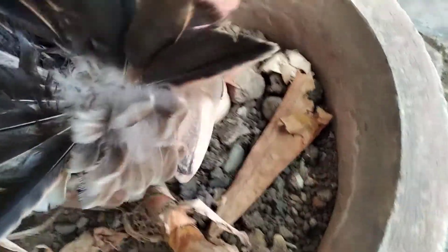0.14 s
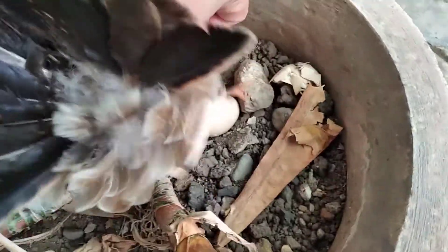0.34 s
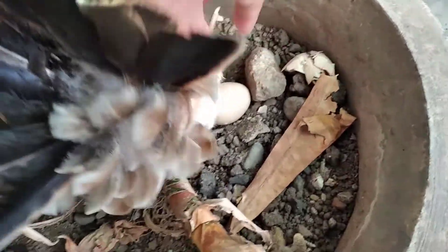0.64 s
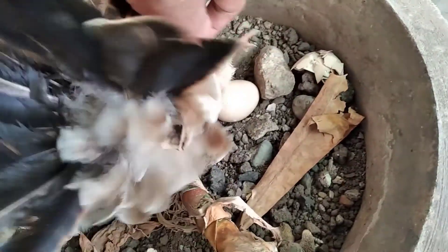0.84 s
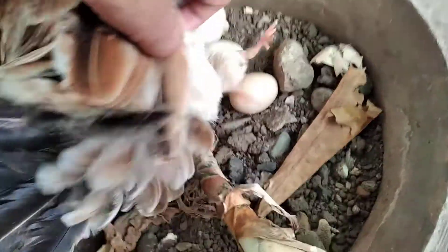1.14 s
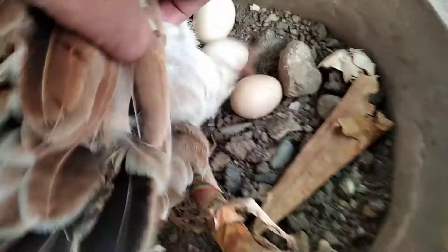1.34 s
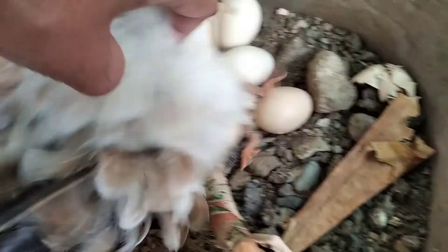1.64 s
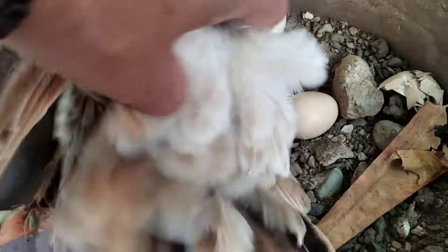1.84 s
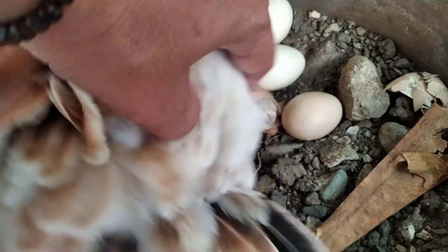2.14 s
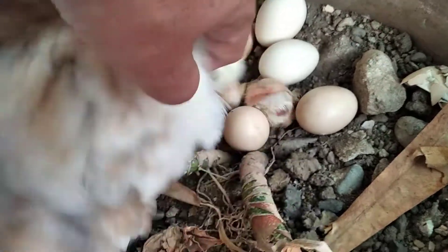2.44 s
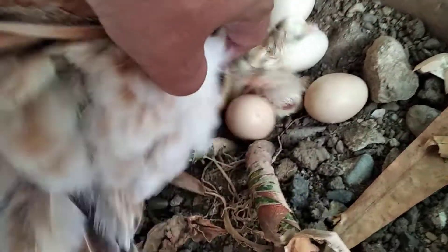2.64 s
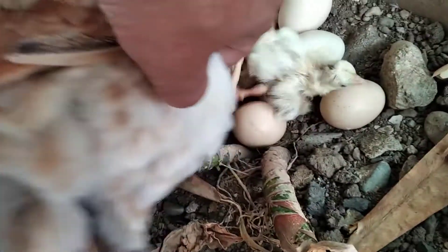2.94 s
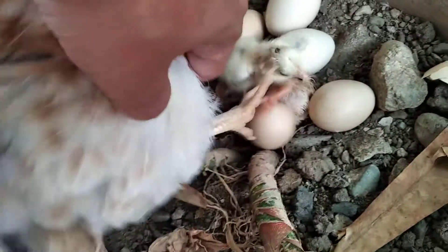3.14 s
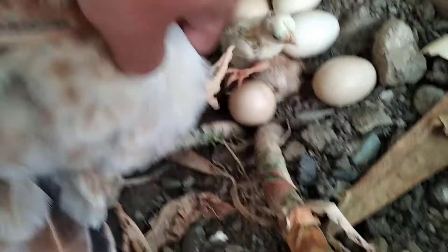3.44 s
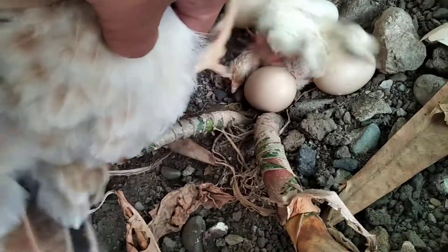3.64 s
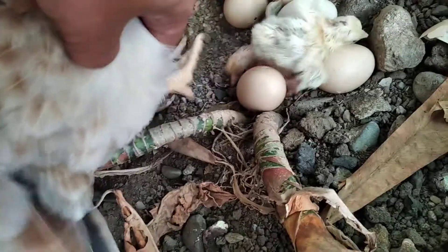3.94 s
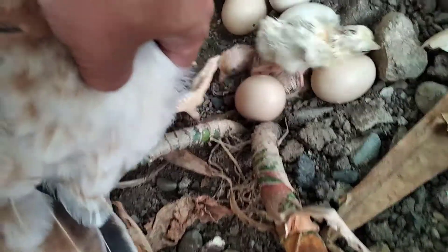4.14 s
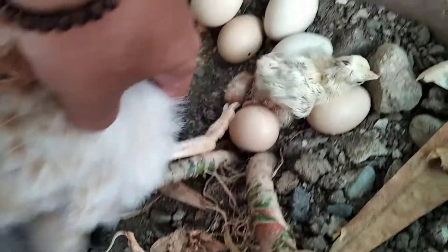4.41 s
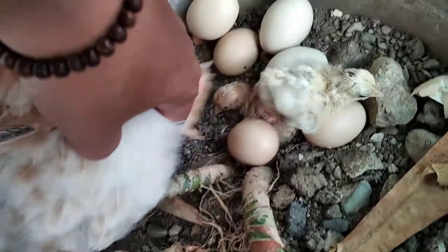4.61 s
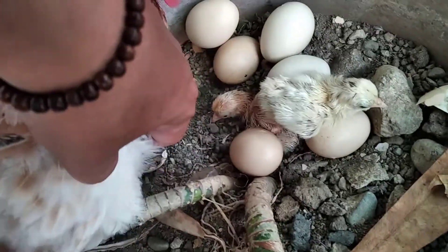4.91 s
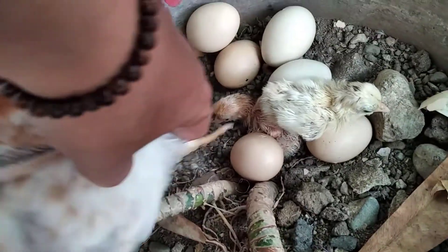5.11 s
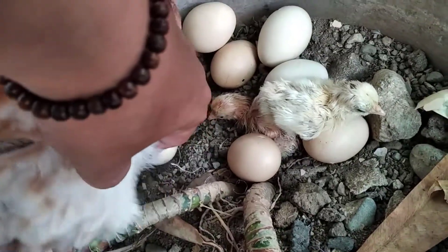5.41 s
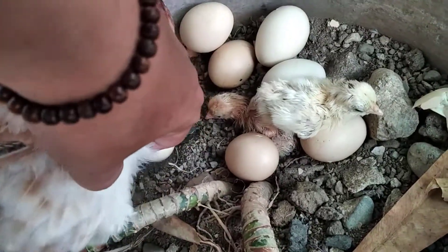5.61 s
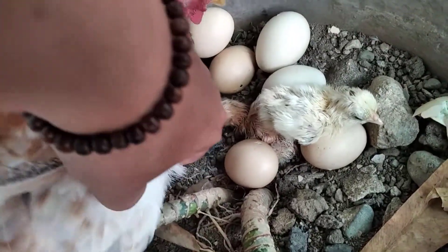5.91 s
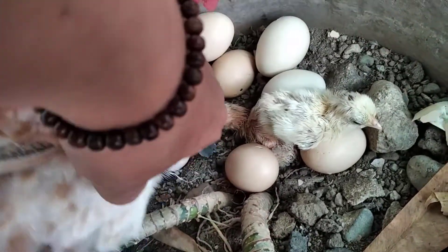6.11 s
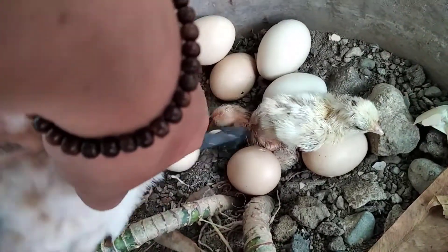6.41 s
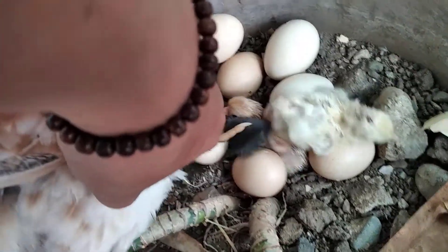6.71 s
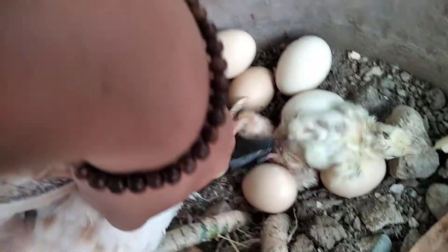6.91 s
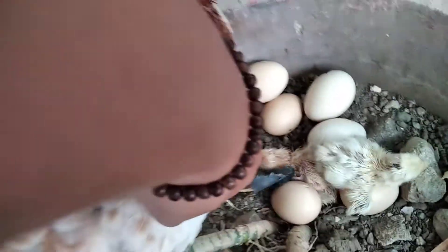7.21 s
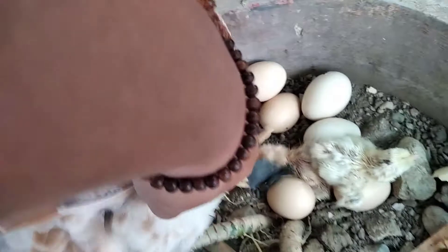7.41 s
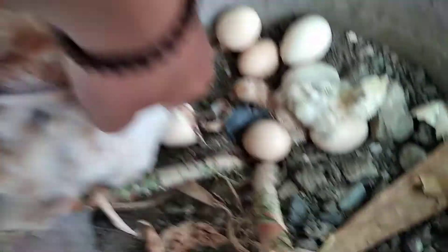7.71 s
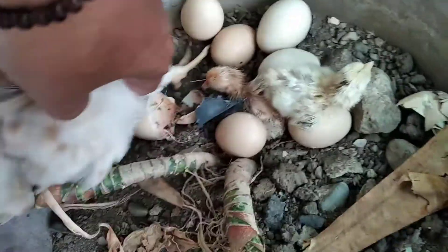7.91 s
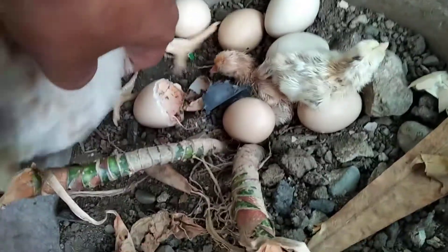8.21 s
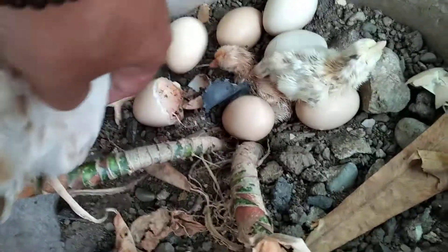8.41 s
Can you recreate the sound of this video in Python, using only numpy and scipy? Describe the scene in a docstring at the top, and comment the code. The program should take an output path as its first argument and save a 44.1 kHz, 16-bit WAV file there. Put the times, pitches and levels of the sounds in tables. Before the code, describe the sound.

Raspy hen squawks give way to short, regular clucks, with piercing chick squeals, small chirps, feather rustle and a few sharp gravel ticks.

```python
"""A hen lifted off her nest in a stone tub squawks, then clucks about three times a second: a
near-sine two-register voice with rasp. Behind her lie a far yard hum and feather rustle, both shaped noise.
Chicks peep and squeal in thin gliding whistles; gravel ticks are decaying noise bursts with a thump.
Two close microphone ports: the left hears the treble later, and its yard and rustle have more bass."""
import sys
import numpy as np
from scipy import signal
from scipy.fft import rfft, irfft
from scipy.io import wavfile
from scipy.ndimage import uniform_filter1d

SR = 44100
rng = np.random.default_rng(int(sys.argv[2]) if len(sys.argv) > 2 else 0)


def store_pcm(level_fs):
    """Save levels as 16-bit WAV."""
    pcm = np.round(np.clip(level_fs, -1, 1) * 32767).astype(np.int16)
    wavfile.write(sys.argv[1], SR, np.atleast_2d(pcm).T)


N = 377055
TIME_S = np.arange(N) / SR


def from_db(db):
    """Logarithmic level: decibels to amplitude gain."""
    return 10 ** (np.asarray(db) / 20)


def rms_one(x):
    """Normalisation: scale to unit rms."""
    return x / np.sqrt(np.mean(x ** 2) + 1e-20)


def drift(hz, size=N):
    """Random modulation: white noise through a two-pole low-pass, scaled to unit rms."""
    pole = np.exp(-2 * np.pi * hz / SR)
    white = rng.standard_normal(size + SR // 4)
    smooth = signal.lfilter([1], [1, -2 * pole, pole * pole], white)
    return rms_one(smooth[SR // 4:])


def add(out, start, sound, pan_db):
    """Superposition: mix a sound in at a time, with a level difference between the ports."""
    i = int(start * SR)
    sound = sound[:N - i]
    out[:, i:i + len(sound)] += sound * from_db([[pan_db / 2], [-pan_db / 2]])


def fade(size, rise_s, fall_s):
    """Amplitude envelope: sine-squared onset and release."""
    t = np.arange(size) / SR
    nearest_end = np.minimum(t / rise_s, t[::-1] / fall_s)
    return np.sin(np.pi / 2 * np.clip(nearest_end, 0, 1)) ** 2


def columns(rows):
    """Linear interpolation: one sampled curve for each column after the time."""
    start_s, *rest = np.transpose(rows)
    t = np.arange(start_s[0], start_s[-1], 1 / SR)
    return [np.interp(t, start_s, column) for column in rest]


def tone(hz, overtones_db, slope_db, count):
    """Harmonic series: a unit-rms fundamental, with overtones that fall off by a slope."""
    phase = 2 * np.pi * (np.cumsum(hz) / SR + rng.random())
    upper = sum(from_db(overtones_db - slope_db * k) * np.cos((k + 2) * phase) for k in range(count))
    return np.sqrt(2) * (np.sin(phase) + upper)


# Bearing of the hen: time_s [s], left_over_right_db [dB]
HEN_BEARING = [(.7, 1), (1.7, 3.5), (2.7, -1), (5.3, -2), (7.4, 3)]


def hen_pan(start_s):
    """Level difference between ports: the hen's left over right level at a time."""
    return np.interp(start_s, *np.transpose(HEN_BEARING))


# Squawk contours, a list for each call: time_s [s], pitch_hz [Hz], level_db [dB], overtones_db [dB]
SQUAWK_CONTOURS = [
    [(0, 698.7, -17, -14.5), (.28, 674.3, -19, -25.5), (.305, 556.6, -22, -12.5), (.33, 502, -20.5, -10.5),
     (.35, 318, -40.5, -5)],
    [(.597, 856, -23.5, -16.5), (.77, 894, -21.5, -9.5), (.81, 851, -22, -0.5), (.83, 609, -28, -4),
     (.86, 430, -33.5, -9)],
    [(.885, 800, -35, 0), (.91, 806, -24, -10), (.935, 724, -24, -11), (.94, 492, -19, -11),
     (.972, 388, -40, 4)],
    [(1.352, 647, -28, -24), (1.365, 566.5, -19.5, -20), (1.45, 375, -30.5, -7)],
    [(1.645, 889, -26.5, -7.5), (1.718, 873, -25, -3), (1.723, 556, -32, -8), (1.742, 407, -18.5, -14)],
    [(8, 535.8, -32, -3.5), (8.118, 610.7, -29.5, 2), (8.122, 891, -21, -10), (8.22, 1047, -27, 0),
     (8.224, 1397, -20.5, -8.5), (8.29, 1314, -20, -16)],
]
# Moments when each squawk flips to the other register: time_s [s]
REGISTER_FLIPS = [
    [.005, .028, .083, .1, .118, .157, .192, .212, .233, .252, .27, .287],
    [.615, .69, .757, .808],
    [.9],
    [1.358, 1.371, 1.395, 1.417],
    [1.712],
    [8.126, 8.14],
]
# Instability of each squawk: jump [log frequency ratio], rattle_depth [dB], uneven_cycles [0-1]
SQUAWK_WARBLES = [(0.45, 1, 0), (-0.33, -0.5, 0.28), (-0.334, 1.5, 0.4), (0.4, 2, 0), (-0.376, 0.5, 0.41),
                  (-0.22, 3, 0.24)]
FLIP_S, RATTLE_HZ = .01, 61.93
HOARSE = 0.31   # depth of the rough grain on the voice


def squawks():
    """Register breaks in a self-oscillating voice, with rattle, alternating cycles and turbulent rasp."""
    out = np.zeros((2, N))
    for rows, flips, (jump, rattle_db, uneven) in zip(SQUAWK_CONTOURS, REGISTER_FLIPS, SQUAWK_WARBLES):
        hz, level_db, overtones_db = columns(rows)
        size, start = len(hz), rows[0][0]
        t = start + TIME_S[:size]
        rattle_hz = RATTLE_HZ * (1 + .3 * drift(30, size=size))
        rattle = np.sin(2 * np.pi * np.cumsum(rattle_hz) / SR)
        flip = sum(rng.uniform(.7, 1.1) * np.exp(-(2 * (t - s) / FLIP_S) ** 4) for s in flips)
        # The voice sags and thickens just before it flips up
        sag = max(jump, 0) * sum(np.exp(-((t - s) / FLIP_S + 1.1) ** 2) for s in flips)
        warble = rattle_db * (.01 * rattle + .007 * drift(60, size=size))
        hz = hz * np.exp(jump * flip - .25 * sag + warble + .04 * drift(500, size=size))
        # The higher register is weaker
        throb_db = -13 * jump * flip + rattle_db * rattle + 1.8 * drift(135, size=size)
        thickness_db = overtones_db + 12 * sag + 2.5 * drift(400, size=size)
        voice = tone(hz, thickness_db, slope_db=6.5, count=8)
        # Strong and weak cycles alternate
        voice = voice * (1 + uneven * np.cos(np.pi * np.cumsum(hz) / SR))
        voice = voice * (1 + HOARSE * drift(600, size=size))
        rasp = from_db(overtones_db - 4.0) * drift(4800, size=size)   # air through the throat
        level = from_db(level_db + throb_db) * fade(size, 0.0019, 0.0035)
        add(out, start, level * (voice + rasp), hen_pan(start))
    return out


# Clucks: start_s [s], length_s [s], high_register_hz [Hz], level_db [dB]
CLUCK_CALLS = [(1.954, 0.027, 939, -20), (2.285, 0.027, 847, -22.5), (2.657, 0.028, 890, -20),
               (2.953, 0.035, 885, -20), (3.273, 0.043, 900, -19), (3.6, 0.027, 878, -23),
               (3.913, 0.042, 792, -20.5), (4.258, .026, 822, -17), (4.613, 0.025, 832, -18),
               (4.94, .025, 807, -15.5), (5.264, 0.032, 874, -16.5), (5.568, 0.027, 829, -17),
               (5.898, 0.028, 829, -17), (6.215, 0.02, 788, -17), (6.563, 0.033, 868, -19.5),
               (7.006, 0.026, 873, -21), (7.369, 0.032, 913, -24), (7.676, 0.03, 832, -26),
               (7.7, .027, 476, -24.5), (7.726, 0.024, 768, -28), (8.258, .037, 715, -17.5)]
# Nearly every cluck drops to the low register at its end
HEN_LOW_HZ, CLUCK_TAIL_S, REGISTER_JUMP_S = 554, 0.01125, 0.0047
TAIL_SAG_HZ_PER_S = 17100   # the low register sinks as a cluck dies
THIN_ABOVE_HZ, THIN_DB_PER_OCTAVE = 870, 112   # the very top of the high register is weak
# A softer cluck longer than this spends a share of the extra time in a low lead-in
BRISK_CLUCK_S, LEAD_SHARE = .027, 0.99


def clucks():
    """Two-register oscillation: nearly every cluck drops to a low sinking tail; overtones grow downwards."""
    out = np.zeros((2, N))
    for start, length, high_hz, level_db in CLUCK_CALLS:
        t = TIME_S[:int(length * SR)]
        size = len(t)
        lead = LEAD_SHARE * max(length - BRISK_CLUCK_S, 0) * (level_db < -17.5)
        tail_start = length - CLUCK_TAIL_S
        in_high = 1. * (t >= lead) * (t < tail_start)
        high = uniform_filter1d(in_high, int(REGISTER_JUMP_S * SR), mode="nearest")
        low_hz = HEN_LOW_HZ - TAIL_SAG_HZ_PER_S * np.maximum(t - length + CLUCK_TAIL_S, 0)
        hz = (low_hz + (high_hz - low_hz) * high) * (1 + 0.06 * drift(193, size=size))
        thin_db = -THIN_DB_PER_OCTAVE * np.maximum(np.log2(hz / THIN_ABOVE_HZ), 0)
        overtones_db = -22 + 14 * np.log2(850 / hz) + 3 * drift(410, size=size)
        voice = tone(hz, overtones_db, slope_db=6, count=2)
        level = from_db(level_db + thin_db + 0.84 * drift(230, size=size))
        level = level * fade(size, 0.0058 + lead / 2, 0.0091)
        add(out, start, level * voice, hen_pan(start))
    return out


def hen():
    """Source-filter principle: throat and beak resonances colour the squawks and clucks."""
    out = squawks() + clucks()
    out = signal.sosfilt(signal.butter(4, 370, "high", fs=SR, output="sos"), out)
    # The beak passes little near 3 kHz
    out = out - .7 * signal.lfilter(*signal.iirpeak(3000, 2.5, fs=SR), out)
    # Throat resonance
    return out + 2.84 * signal.lfilter(*signal.iirpeak(1750, 5, fs=SR), out)


# Port balance of the rustle and yard noise: frequency_hz [Hz], left_over_right_db [dB]
NOISE_BALANCE = [(330, 12.5), (700, -1), (5000, 2), (15000, 10)]


def coloured(white, spectrum, alike_hz):
    """Interchannel coherence: shaped shared and separate noises; likeness falls towards the treble."""
    hz = np.fft.rfftfreq(N, 1 / SR) + 1

    def at(points):
        """Interpolation over log frequency."""
        point_hz, point_db = np.array(points).T
        return np.interp(np.log(hz), np.log(point_hz), point_db)

    shared, left, right = rfft(white)
    alike = 1 / (1 + hz / alike_hz)
    pair = np.sqrt(alike) * shared + np.sqrt(1 - alike) * np.array([left, right])
    return irfft(pair * from_db(at(spectrum) + at(NOISE_BALANCE) * [[.5], [-.5]]), N)


# Relative spectrum of the yard: frequency_hz [Hz], density_db [dB per Hz]
YARD_SPECTRUM = [(30, -28.5), (103, 4.5), (330, -4.5), (570, 3.5), (1440, -3.5), (2400, -1), (8200, -10),
                 (12000, -20.5)]
YARD_DB = -42.5


def yard():
    """Stationary noise: a steady far background with a fixed spectrum."""
    return from_db(YARD_DB) * rms_one(coloured(rng.standard_normal((3, N)), YARD_SPECTRUM, alike_hz=1110))


# Relative spectrum of the feathers: frequency_hz [Hz], density_db [dB per Hz]
FEATHER_SPECTRUM = [(150, -34), (700, -22), (3500, -17), (8000, -15), (12000, -24)]
# Strokes of feathers and hand: start_s [s], length_s [s], level_db [dB]
FEATHER_STROKES = [(1.223, 0.087, -30), (1.668, 0.18, -26), (1.784, 0.54, -35.5), (2.402, 0.26, -32.5),
                   (2.691, .44, -30), (3.163, 0.16, -37.5), (3.581, 0.081, -27), (5.047, 0.22, -37),
                   (5.678, 0.47, -35.5), (6.379, 0.37, -42.5), (7.87, .68, -37.5)]
DULL_PER_S = 0.64   # share of dull sound grows with the length of a stroke


def rustle():
    """Friction noise: dense fine grains in uneven clumps, with longer strokes sounding duller."""
    grain_db = 2.5 * rng.exponential(1, N) + 1.8 * drift(60)
    grains = rng.standard_normal((3, N)) * from_db(grain_db)
    bright = rms_one(coloured(grains, FEATHER_SPECTRUM, alike_hz=1360.0))
    dull = rms_one(signal.sosfilt(signal.butter(2, 2200, fs=SR, output="sos"), bright))
    out = from_db(-45.5 + 6.2 * drift(4.0)) * bright   # faint fidgeting throughout
    for start, length, level_db in FEATHER_STROKES:
        part = slice(int(start * SR), int((start + length) * SR))
        size = part.stop - part.start
        share = np.clip(DULL_PER_S * length, 0, 1)
        stroke = from_db(level_db + 4.3 * drift(4.0, size=size)) * fade(size, 0.23 * length, 0.53 * length)
        out[:, part] += stroke * (share * dull[:, part] + (1 - share) * bright[:, part])
    return out


def arch(first_hz, crest_hz, last_hz, crest_s, length):
    """Frequency glide: pitch eases up to a crest, then falls away ever faster."""
    turn = np.interp(TIME_S[:int(length * SR)], [0, crest_s, max(length, crest_s)], [-1, 0, 1])
    below_rising = (crest_hz - first_hz) * np.sin(np.pi / 2 * turn) ** 2
    below_falling = (crest_hz - last_hz) * np.abs(turn) ** 1.62
    return crest_hz - np.where(turn < 0, below_rising, below_falling)


CHICK_PURER_DB_PER_OCTAVE = 19   # the overtone fades as a chick sings higher


def cheep(hz):
    """Near-pure whistle: a fundamental and one overtone that weakens with pitch."""
    overtone_db = -7.0 - CHICK_PURER_DB_PER_OCTAVE * np.log2(hz / 2575)
    return tone(hz, overtone_db, slope_db=0, count=1)


# Peeps much louder on the left are weakened near this pitch
WEAK_HZ, WEAK_WIDTH_HZ, WEAK_DB = 5150, 435, -14


def weak(hz):
    """Gaussian notch weight: 1 at the weak pitch, near 0 far from it."""
    return np.exp(-((hz - WEAK_HZ) / WEAK_WIDTH_HZ) ** 2)


# Arched peeps: start_s [s], length_s [s], crest_after_s [s], first_hz [Hz], crest_hz [Hz],
# last_hz [Hz], level_db [dB], left_over_right_db [dB]
ARCHED_PEEPS = [(0.658, 0.16, 0.052, 5450, 5840, 4700, -34, 14),
                (2.157, 0.051, .02, 4990, 5350, 4660, -9, 17), (3.119, .1, 0.033, 5200, 5510, 2300, -21, 5),
                (3.309, 0.039, 0.022, 2700, 3900, 2900, -34, 11),
                (3.528, 0.047, 0.014, 3800, 4040, 2700, -27.5, 4),
                (3.561, 0.073, 0.024, 5300, 5500, 2300, -23, 8),
                (3.968, .095, .05, 5100, 5350, 2500, -23, 7), (4.117, .066, .04, 2900, 4000, 3100, -29, 9),
                (4.433, .06, .04, 3100, 5350, 4900, -37, 6), (4.761, .08, .04, 2700, 4650, 2200, -27, 14.5),
                (5.367, 0.071, 0.04, 3300, 5200, 3400, -33.5, 20.5),
                (6.098, 0.063, 0.037, 3400, 5200, 3300, -32.5, 13.5),
                (6.686, .058, .03, 2700, 5100, 3200, -31, 17),
                (7.069, .048, .018, 3940, 4680, 2900, -25, 7.5),
                (7.134, .072, .04, 2980, 3920, 3400, -34, 12.5),
                (7.62, .032, .014, 4850, 5400, 4900, -36, 6),
                (8.228, .07, 0.051, 3600, 5300, 2300, -33.5, 20)]
# Straight glides: start_s [s], length_s [s], first_hz [Hz], last_hz [Hz], level_db [dB],
# left_over_right_db [dB]
SHORT_TWITTERS = [(2.517, .014, 4720, 3800, -23.5, 3), (5.139, 0.03, 2820, 4800, -30.5, 13.5),
                  (5.761, 0.041, 2820, 5600, -35, 19), (6.306, 0.016, 2620, 3600, -41.5, 3),
                  (6.441, 0.043, 2650, 2540, -36.5, 0), (6.925, 0.046, 3050, 3900, -29, 8.5),
                  (7.989, 0.04, 2710, 5400, -31.5, 17), (8.341, 0.041, 3150, 4100, -36, 8)]


def peeps():
    """Frequency-modulated whistles: arched peeps and straight twitters."""
    out = np.zeros((2, N))
    for start, length, *shape, level_db, pan_db in ARCHED_PEEPS + SHORT_TWITTERS:
        if len(shape) > 2:
            crest_s, first_hz, crest_hz, last_hz = shape
            hz = arch(first_hz, crest_hz, last_hz, crest_s, length)
        else:
            hz = np.linspace(*shape, int(length * SR))
        thin_db = WEAK_DB * (pan_db > 10) * weak(hz)
        level = from_db(level_db + thin_db + 2.0 * drift(370, size=len(hz)))
        add(out, start, level * fade(len(hz), 0.18 * length, 0.25 * length) * cheep(hz), pan_db)
    return out


# Squeal contours, a list for each call: time_s [s], pitch_hz [Hz], level_db [dB]
SQUEAL_CONTOURS = [
    [(1.572, 5560, -31), (1.583, 6180, -13.5), (1.606, 5350, -20.5), (1.617, 4100, -15.5),
     (1.66, 5650, -36), (1.683, 5150, -27)],
    [(1.8, 6020, -23.5), (1.836, 6490, -10.5), (1.849, 6190, -12), (1.855, 4910, -20.5), (1.872, 4740, -23)],
    [(2.523, 5650, -18), (2.543, 6080, -8.5), (2.572, 6166, -6), (2.575, 6180, -14), (2.584, 5900, -5),
     (2.596, 5800, -8), (2.603, 5530, -9.5), (2.613, 5260, -2.5), (2.643, 5200, -12), (2.654, 2930, -17.5)],
    [(2.802, 5090, -13), (2.835, 5500, -4.5), (2.865, 5564, -5), (2.908, 4960, -8.5)],
    [(3.686, 3700, -19), (3.704, 4700, -21), (3.714, 4860, -8), (3.72, 3340, -15), (3.736, 4700, -4),
     (3.748, 2730, -24)],
]
# Flutter of each squeal: left_over_right_db [dB], quickens_s [s], first_hz [Hz], last_hz [Hz],
# slowing [exponent], early_depth [0-1], late_hz [Hz], late_depth [0-1], pitch_pull [-1 to 1]
SQUEAL_FLUTTERS = [(3, 1.62, 70, 70, 2, .85, 500, .5, .42), (5.6, 1.85, 600, 720, 2, 1, 750, .9, -.5),
                   (7.4, 2.62, 500, 0, 8, .7, 640, .6, .42), (5.4, 2.867, 650, 160, 2, .9, 720, .75, .42),
                   (5.7, 3.71, 700, 700, 2, .6, 900, .3, .42)]


def squeals():
    """Amplitude and frequency modulation: a flutter whose rate jumps up sets side tones on a whistle."""
    out = np.zeros((2, N))
    for rows, flutter_row in zip(SQUEAL_CONTOURS, SQUEAL_FLUTTERS):
        pan_db, quickens, first_hz, last_hz, slowing, early_depth, late_hz, late_depth, pull = flutter_row
        hz, level_db = columns(rows)
        hz = uniform_filter1d(hz, size=200, mode="nearest")
        size, start = len(hz), rows[0][0]
        t = TIME_S[:size]
        late = np.clip((start + t - quickens) / 0.0038, 0, 1)
        remaining = np.clip(1 - t / (quickens - start), 0, 1)
        early_hz = last_hz + (first_hz - last_hz) * remaining ** slowing
        flutter_hz = early_hz + (late_hz - early_hz) * late
        depth = early_depth + (late_depth - early_depth) * late
        depth = depth * np.minimum(flutter_hz / 60, 1)   # a stalled flutter leaves a clean whistle
        beat = np.cumsum(flutter_hz * np.exp(0.06 * drift(120, size=size))) / SR % 1
        # Each beat closes slowly, then snaps open
        flutter = 1 - depth * beat ** 1.8 * np.minimum((1 - beat) / .12, 1)
        hoarse = 1 + .12 * depth * drift(400, size=size)
        flutter = uniform_filter1d(flutter, size=24) * hoarse
        # Pitch is pulled along, so one side tone is stronger
        hz = hz + pull * depth * flutter_hz * np.sin(2 * np.pi * beat)
        level = from_db(level_db) * flutter * fade(size, 0.00086, 0.0036)
        add(out, start, level * cheep(hz), pan_db)
    return out


# Gravel ticks: start_s [s], level_db [dB, scales crack, grit and thump together]
GRAVEL_TICKS = [(1.485, -20), (1.7466, -2), (2.035, -25), (2.5153, -11), (6.8958, -27)]
THUMP_HZ, THUMP_S, THUMP_DB = 205, 0.0059, -22   # a low thump under the crack; dB relative to the tick


def gravel():
    """Impulse excitation: a sharp crack, a short gritty tail and a low damped thump."""
    out, t = np.zeros((2, N)), TIME_S[:SR // 25]
    thump = from_db(THUMP_DB) * np.sin(2 * np.pi * THUMP_HZ * t) * np.exp(-t / THUMP_S)
    decay = 1.6 * np.exp(-t / 0.001) + 0.2 * np.exp(-t / 0.015)
    for start, level_db in GRAVEL_TICKS:
        grit = .5 * decay * rng.standard_normal(len(t))
        crack = 2 * (t == 0)
        add(out, start, from_db(level_db) * (grit + crack + thump), pan_db=3)
    return signal.sosfilt(signal.butter(2, 120, "high", fs=SR, output="sos"), out)


def tub(x):
    """Reverberation: convolution with decaying noise, for faint echoes off tub wall and ground."""
    t = TIME_S[:SR // 8]
    tail = rng.standard_normal((2, len(t))) * np.exp(-t / .028) * (t > .002)
    return signal.fftconvolve(x, from_db(-45) * tail, axes=1)[:, :N]


# Phase of the left port: frequency_hz [Hz], phase_rad [radians]
LEFT_PORT_PHASE = [(900, -.4), (1250, -2.4), (2200, -2.8), (2800, -6.1), (5500, -13.5), (15000, -38)]


def scene():
    """Superposition of all sources; the left port's phase lag grows towards the treble."""
    near = hen() + peeps() + squeals() + gravel()
    left, right = near + tub(near) + rustle() + yard()
    phase = np.interp(np.fft.rfftfreq(N, 1 / SR), *np.transpose(LEFT_PORT_PHASE))
    return np.array([irfft(rfft(left) * np.exp(1j * phase), N), right])


CUTOFF_HZ = 15100


def record(dry):
    """Band limiting: the ports dip near 5 kHz, the top is cut and full scale clips."""
    dip = dry - 0.75 * signal.lfilter(*signal.iirpeak(5100, 7, fs=SR), dry)
    cut = signal.sosfilt(signal.cheby2(12, 70, CUTOFF_HZ, fs=SR, output="sos"), dip)
    return np.clip(cut, -1, 1)


dry = scene()
out = record(dry)
store_pcm(out)
```